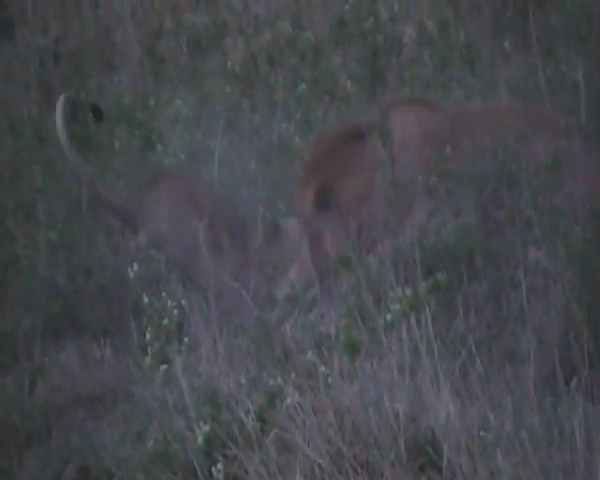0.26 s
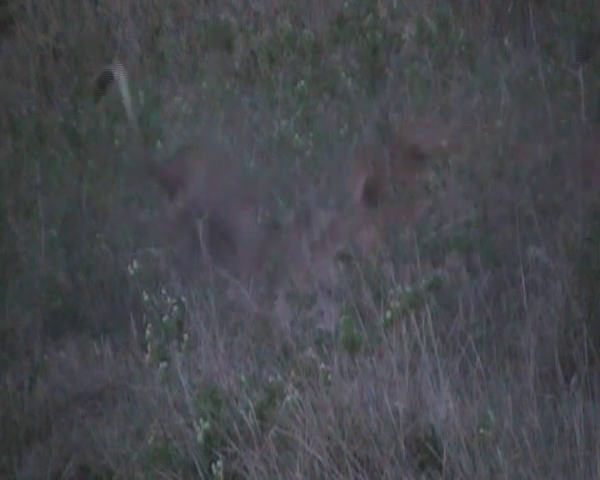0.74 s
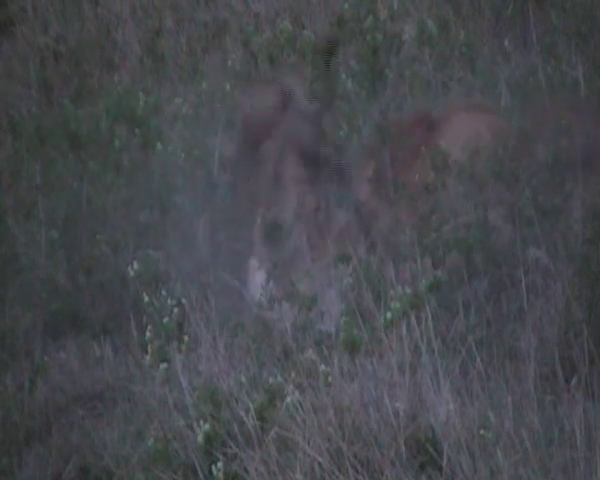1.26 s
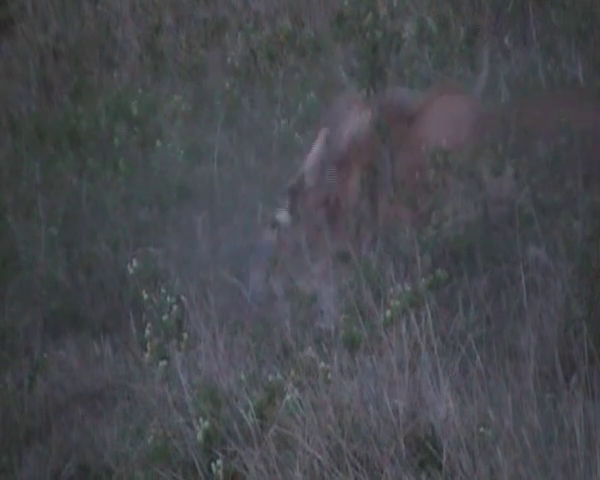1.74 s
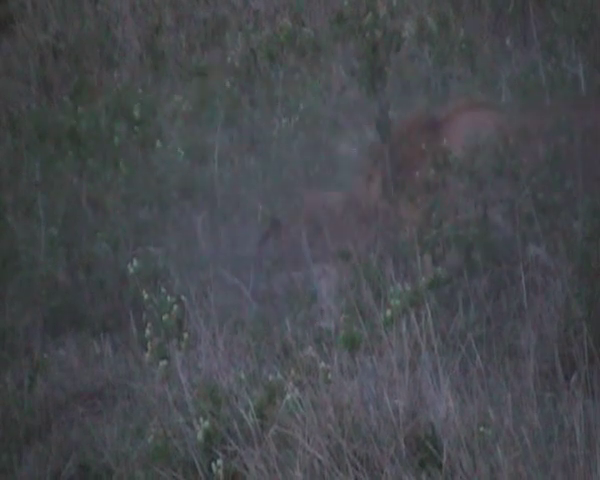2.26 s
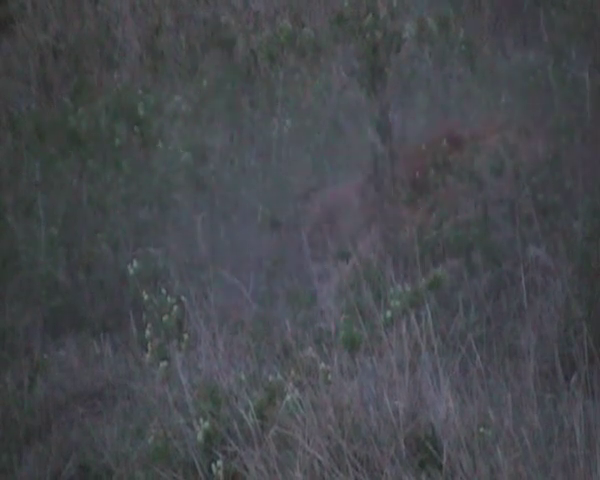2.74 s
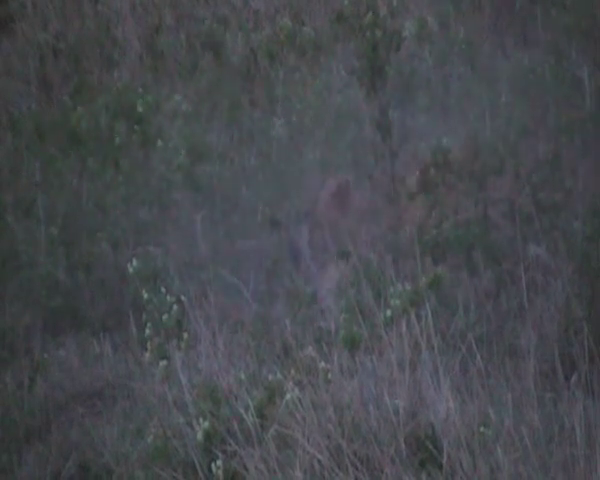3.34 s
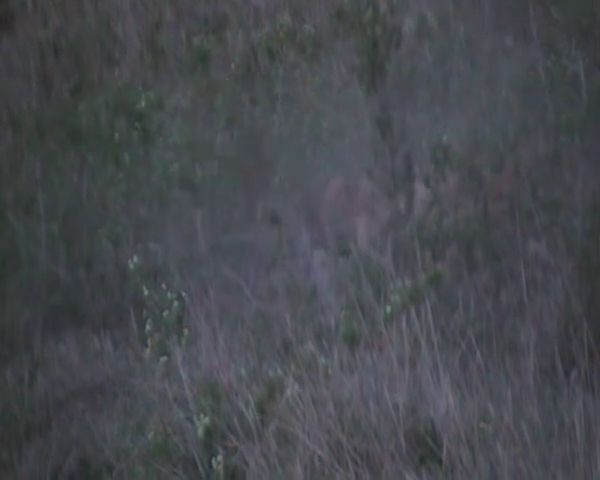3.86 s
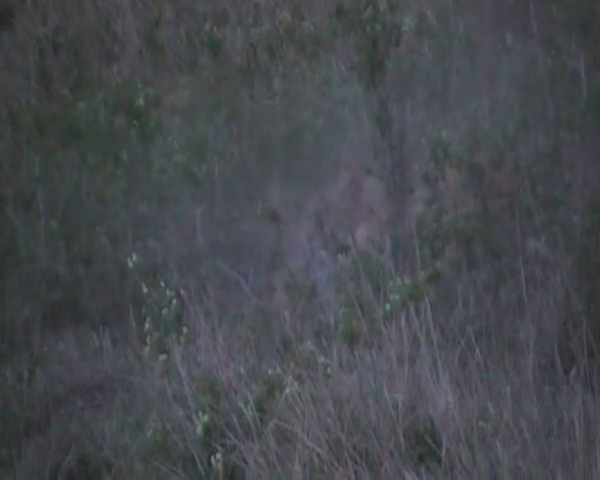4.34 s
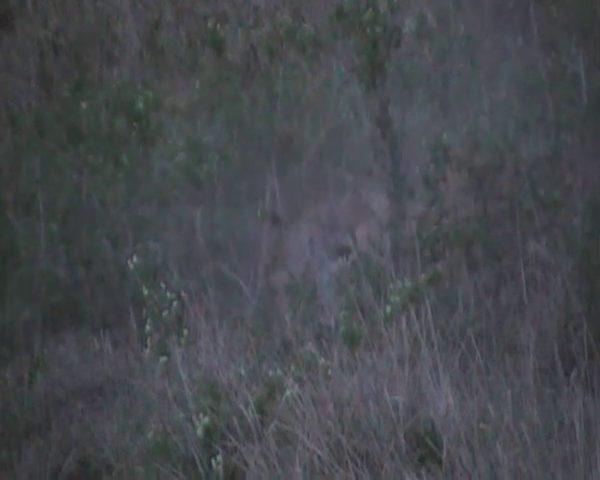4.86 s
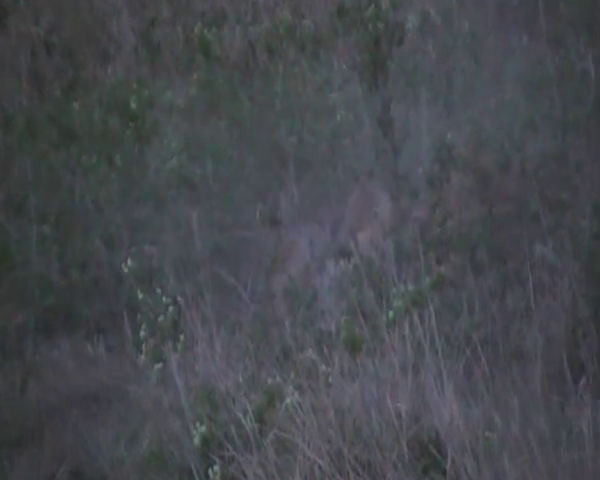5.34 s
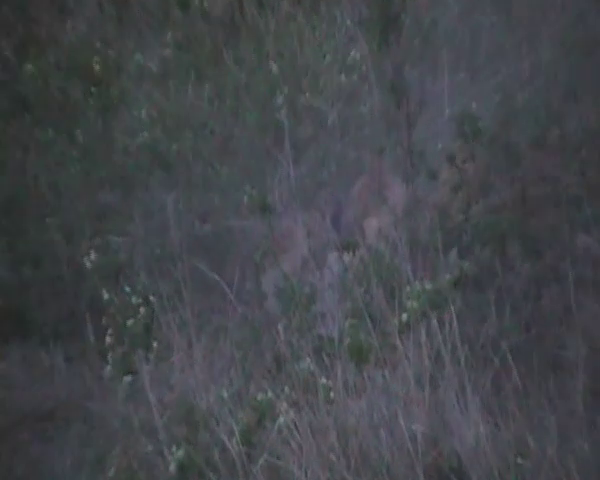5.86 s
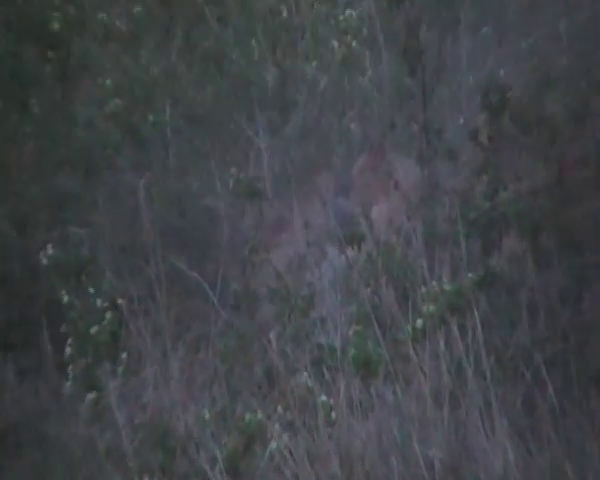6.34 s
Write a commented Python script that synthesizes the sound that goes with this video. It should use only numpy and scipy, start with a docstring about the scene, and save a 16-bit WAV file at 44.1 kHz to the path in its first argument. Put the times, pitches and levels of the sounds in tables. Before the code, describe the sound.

Silence at first, then grass rustle, twig snaps and a thump as lions pull down a warthog in dry bush. It gives a long piercing scream, fluttering and torn with rasp, dropping to a lower wail. After a short rattle comes an arching squeal, hoarse stuttering croaks, throat snaps and a last squeal cut off. A cricket chirps steadily with pauses. The fight is straight ahead, loud and fairly close, with faint bush echo and a low drone.

```python
"""Warthog seized by lions

Dry bush at dusk: one long harsh scream breaks into a wail, then hoarse croaks and arching squeals.
The voice is a high whistle chopped by the slow, uneven flutter of the throat, with rasping noise in every puff.
Around it a cricket plays short sagging tones with two rests, grass rustles, twigs snap and low thumps fall:
bodies on the ground and one gulp of the throat. Noise tails give a faint echo from the bush; a low drone
and open air lie beneath."""
import sys
import numpy as np
from scipy import signal
from scipy.fft import rfft, irfft, next_fast_len
from scipy.io import wavfile
from scipy.ndimage import uniform_filter1d, map_coordinates

SR = 44100
rng = np.random.default_rng(int(sys.argv[2]) if len(sys.argv) > 2 else 0)


def store_pcm(level_fs):
    """Save levels as 16-bit WAV."""
    pcm = np.round(np.clip(level_fs, -1, 1) * 32767).astype(np.int16)
    wavfile.write(sys.argv[1], SR, np.atleast_2d(pcm).T)


N = 291045

# Table and setting levels are relative: the mixes below trim them.


def amp(db):
    """Decibels to gain."""
    return 10 ** (np.asarray(db) / 20)


def unit(x):
    """Scale to rms 1."""
    return x / np.sqrt(np.mean(x ** 2) + 1e-20)


def clock():
    """Time of every sample in seconds."""
    return np.arange(N) / SR


def since(s):
    """Seconds gone by after a moment, 0 before it."""
    return np.maximum(clock() - s, 0)


def along(points, hz):
    """Interpolate (Hz, value) points on a log axis."""
    f, v = np.transpose(points)
    return np.interp(np.log(hz + 1), np.log(f + 1), v)


def curves(rows):
    """One value per sample for each column after the time."""
    s, *cols = np.transpose(rows)
    return [np.interp(clock(), s, c) for c in cols]


def window(start, end, edge):
    """1 between two times, with sloping edges."""
    return np.clip(np.minimum(clock() - start, end - clock()) / edge + .5, 0, 1)


def bump(s, half_s):
    """A bell in time around s, peak 1."""
    return np.exp(-((clock() - s) / half_s) ** 2)


def blow(s, rise_s):
    """A quick swell that peaks after rise_s and dies away."""
    swell = since(s) / rise_s
    return swell * np.exp(1 - swell)


def wobble(rate):
    """A smooth random curve, rate knots a second."""
    return map_coordinates(rng.standard_normal(int(N * rate / SR) + 4), [clock() * rate])


def filtered(x, response):
    """Multiply the spectrum of x by a response of frequency."""
    m = next_fast_len(N + SR // 2)
    return irfft(rfft(x, m) * response(np.fft.rfftfreq(m, 1 / SR)), m)[..., :N]


def noise(spectrum, gate=1):
    """Gated noise of rms 1 with a given colour."""
    return unit(filtered(gate * rng.standard_normal(N), lambda hz: amp(along(spectrum, hz))))


def ring(modes, gate=1):
    """Gated noise of rms 1 in resonances, each squared to steepen it."""
    def body(f):
        return sum(amp(db) * (1j * f * w / (c * c - f * f + 1j * f * w)) ** 2 for c, w, db in modes)
    return unit(filtered(gate * rng.standard_normal(N), body))


def formant(centre, width_hz, gate):
    """Gated noise of rms 1 in a resonance that moves."""
    slow = filtered(gate * rng.standard_normal((2, N)), lambda hz: 1 / (1 + (2 * hz / width_hz) ** 2))
    phase = 2 * np.pi * np.cumsum(centre) / SR
    return unit(slow[0] * np.cos(phase) + slow[1] * np.sin(phase))


def patches(x, depth_db):
    """Turbulence shifts: narrow bands swell and fade on their own."""
    z = signal.stft(x, nperseg=512)[2]
    field = rng.standard_normal(z.shape)
    field = uniform_filter1d(uniform_filter1d(field, size=3, axis=0), size=9, axis=1)
    return unit(signal.istft(z * amp(depth_db * unit(field)), nperseg=512)[1][:N])


# Colour of the open air. Each row: frequency in Hz, density in dB per Hz.
AIR_SPECTRUM = [(15, -55), (25, -84), (60, -5), (125, -2), (186, -1), (299, -8.5), (353, 0.5), (399, -4),
                (712, -6.5), (858, -6.5), (1810, -12), (2040, -8.5), (3500, -23), (4550, -63), (7700, -120)]


def background():
    """Coloured noise of open air and a low, distant drone, a little different at each ear."""
    def bed():
        return amp(-47) * noise(AIR_SPECTRUM) + amp(-51.0) * ring([(74.7, 38, 0)])
    side = amp(-7) * np.array([[1], [-1]])
    return bed() + side * bed()


# Trampled grass. Each row: time in seconds, level in dB.
GRASS_LEVEL = [(.69, -54), (.8, -48.5), (1.1, -52.5), (3.8, -52), (4.15, -49), (5.3, -57.5), (6.6, -63)]
# Colour of dry straw. Each row: frequency in Hz, density in dB per Hz.
STRAW_SPECTRUM = [(50, -25), (200, 10.5), (600, -26), (1500, -8), (3000, 5.5), (7000, 8.5), (10300, 9),
                  (11500, -5.5), (14000, -10), (15500, -59)]
# Twig snaps. Each row: start in seconds, starting level in dB.
TWIG_SNAPS = [(0.961, -26), (0.9714, -41), (1.0242, -28.5), (1.061, -40), (5.858, -31)]
# Low thumps: bodies on the ground, but at 4.945 s a low gulp of the throat as the voice catches.
# Each row: start in seconds, frequency in Hz, peak level in dB.
LOW_THUMPS = [(.78, 230, -34.5), (1.76, 179.2, -41), (2.042, 175, -31), (3.715, 181, -31),
              (4.027, 184, -34), (4.945, 185.3, -35)]


def scuffle():
    """Grass is flickering noise, twigs are decaying noise without bass, thumps and gulp are brief low tones."""
    grass_gain = amp(curves(GRASS_LEVEL)[0] + 0.4 * wobble(8.5))
    out = grass_gain * noise(STRAW_SPECTRUM, amp(2.5 * wobble(700)))
    crack = unit(filtered(noise(STRAW_SPECTRUM), lambda hz: hz / (hz + 1500)))  # a thin twig has no body
    for s, db in TWIG_SNAPS:
        age = since(s)
        out = out + amp(db - 60 * age / 0.021) * crack * (age > 0)
    for s, hz, db in LOW_THUMPS:
        out = out + amp(db) * blow(s, rise_s=0.0042) * np.sin(2 * np.pi * hz * clock())
    return out


# Cricket timing. Each row: chirp number, time in seconds.
CHIRP_TIMES = [(0, .722), (4, 1.09), (43, 4.692), (50, 5.355), (55, 5.82), (60, 6.278), (64, 6.645)]
# Cricket rests. Each row: start in seconds, end in seconds.
CRICKET_RESTS = [(3.67, 4.68), (6.33, 6.7)]


def cricket(top_hz=4840, fall_hz=230, length_s=0.029, level_db=-31):
    """Each wing stroke is a short tone that sags in pitch; others far off are a band of noise."""
    number, s = np.transpose(CHIRP_TIMES)
    period_s = np.mean(np.diff(s) / np.diff(number))
    age = np.interp(clock(), s, number) % 1 * period_s
    stroke = np.clip(age / length_s, 0, 1)
    phase = 2 * np.pi * np.cumsum(top_hz - fall_hz * stroke ** 0.87) / SR
    envelope = np.abs(np.sin(np.pi * stroke)) ** 0.49
    awake = 1 - sum(window(a, b, .01) for a, b in CRICKET_RESTS)
    return amp(level_db) * envelope * np.sin(phase) * awake + amp(-51.5) * ring([(4730, 650, 0)])


def flutter(rate, depth, rough, jitter=.36):
    """Uneven throat opening: cycle count, opening 0-1, puffs with running mean power 1, roughness, depth."""
    depth, rough = np.clip(depth, 0, 1), np.clip(rough, .02, 1.2)
    cycles = np.cumsum(rate * np.exp(jitter * np.sqrt(rough) * wobble(260))) / SR
    opening = (.5 - .5 * np.cos(2 * np.pi * cycles)) ** 1.328
    puffs = 1 - depth + depth * opening
    puffs = puffs / np.sqrt(np.abs(uniform_filter1d(puffs ** 2, SR // 25)))
    return cycles, opening, puffs, rough, depth


def whistle(pitch, throat, smear=.13, bend=0.11, waver=.008):
    """Phase of the whistle: it bends upward within each puff and scatters when the throat is rough."""
    cycles, opening, puffs, rough, depth = throat
    scatter = smear * rough * wobble(1100) * (1.5 - opening)
    glide = bend * depth * np.sin(2 * np.pi * cycles)
    drift = scatter - glide + waver * wobble(45)
    return 2 * np.pi * np.cumsum(pitch * (1 + drift)) / SR


def partial(phase, order):
    """One harmonic of the whistle, rms 1."""
    return np.sqrt(2) * np.sin(order * phase)


# Snout cavities. Each row: frequency in Hz, width in Hz, level in dB.
SNOUT_MODES = [(473, 48, -0.5), (390, 20, -7)]
SNOUT_TONE_HZ, SNOUT_TONE_DB = 488, -7.5


def snout(throat):
    """The snout's boom: puffs in its cavities around a firm, wavering note."""
    phase = whistle(SNOUT_TONE_HZ, throat, smear=0.034, bend=0.022, waver=.035)
    note = throat[2] * partial(phase, order=1)
    return amp(-2.5) * ring(SNOUT_MODES, throat[2]) + amp(SNOUT_TONE_DB) * note


# Scream. Each row: time in seconds, whistle pitch in Hz, whistle level in dB.
SCREAM_PATH = [(1.125, 2150, -23), (1.191, 3000, -17), (1.38, 2758, -17), (1.55, 2915, -23.5),
               (1.68, 3304, -21.5), (1.784, 2679, -13), (1.85, 3151, -31), (2.02, 3296, -22),
               (2.27, 2893, -27.5), (2.39, 3153, -15.5), (2.53, 2923, -15.5), (2.63, 3358, -25),
               (2.69, 3080, -12.5), (2.81, 3013, -16.5), (2.869, 2537, -12), (2.944, 2120, -11)]
# Lowest mouth resonance, moving with the jaw. Each row: time in seconds, frequency in Hz.
JAW_RESONANCE = [(1.8, 871.5), (1.95, 1150), (2.12, 1150), (2.3, 957.3), (2.48, 853.8), (2.62, 1069),
                 (2.8, 953.6)]
# Colour of the rasp. Each row: frequency in Hz, density in dB per Hz.
HARSH_SPECTRUM = [(600, -22), (740, -1), (1000, 2), (1500, 2), (2300, 0.5), (3300, -2), (4400, -12),
                  (5200, -32), (7000, -39), (12000, -70)]
# Colour of the hiss. Each row: frequency in Hz, density in dB per Hz.
HISS_SPECTRUM = [(3000, 2.5), (5200, -1.5), (6800, -25), (7700, -3), (8700, 6), (9800, 7), (10500, -6),
                 (11200, -1), (13000, -13), (14200, -23), (15500, -68)]
# Shrill ring above the voice. Each row: frequency in Hz, width in Hz, level in dB.
SHRILL_MODES = [(6590, 560, 0)]
# The ring flares when the scream is pushed highest. Each row: time in seconds, half length in seconds, lift in dB.
SHRILL_FLARES = [(1.71, 0.34, 15), (2.016, 0.065, 19), (2.67, .13, 13)]
SHRILL_DB, SCREAM_HISS_DB = -29, -26.5
TEAR_S, TEAR_LENGTH_S = 1.735, .11  # the scream tears into a rasp
RASP_DB, TEAR_RASP_DB, RASP_GROWTH_DB_PER_S = -40.5, 15, 2.5  # at first, added by the tear, growth
OCTAVE_DB, OCTAVE_FADE_DB_PER_S2 = -18.5, 1.37
SNOUT_DB, SNOUT_FADE_DB_PER_S = -22.5, 2.5
TREBLE_LAG_DB, TREBLE_LAG_S = -12, 0.027  # the treble arrives as the mouth opens
# a firm upper strand that follows the whistle only a little
STRAND_HZ, STRAND_FOLLOW, STRAND_DB, STRAND_END_S = 3193, .3, -25.5, 3.7


def scream():
    """Wide mouth: a whistle, part firm and part torn, over a loud rasp; snout boom below, shrill ring above."""
    pitch, whistle_db = curves(SCREAM_PATH)
    start_s, end_s = SCREAM_PATH[0][0], SCREAM_PATH[-1][0]
    age = since(start_s)
    tear = np.clip(since(TEAR_S) / TEAR_LENGTH_S, 0, 1)
    opening_db = TREBLE_LAG_DB * np.exp(-age / TREBLE_LAG_S)
    flare_db = sum(db * bump(s, half_s) for s, half_s, db in SHRILL_FLARES)
    octave_db = OCTAVE_DB - OCTAVE_FADE_DB_PER_S2 * age ** 2 + opening_db
    octave_db = octave_db - 0.15 * flare_db  # a flare draws from the octave
    rasp_db = RASP_DB + TEAR_RASP_DB * tear + RASP_GROWTH_DB_PER_S * age
    hiss_db = SCREAM_HISS_DB + opening_db
    snout_db = SNOUT_DB - SNOUT_FADE_DB_PER_S * age
    shrill_db = SHRILL_DB + flare_db + opening_db

    throat = flutter(rate=248 * (pitch / 3000) ** .8, depth=.56 - 0.15 * tear,
                     rough=.45 + .42 * tear, jitter=.28)
    puffs = throat[2]
    torn = whistle(pitch, throat, smear=.11, bend=0.1, waver=0.014)
    core = whistle(pitch, throat, smear=.015, bend=.06, waver=.008)
    strand_hz = STRAND_HZ * (pitch / 3000) ** STRAND_FOLLOW
    strand = whistle(strand_hz, throat, smear=0.0197, bend=0.023)
    jaw = whistle(curves(JAW_RESONANCE)[0], throat, smear=0.049, bend=0.12, waver=0.0285)

    def blend(order):
        return .68 * partial(core, order) + .73 * partial(torn, order)

    tone = amp(whistle_db - 2.5) * blend(order=1) + amp(octave_db - 2.5) * blend(order=2)
    overtones = 1.23 * partial(torn, order=3) + 0.5 * partial(core, order=3) + 0.21 * partial(core, order=4)
    tone = tone + amp(hiss_db - 6.5) * overtones
    strand_gain = amp(STRAND_DB + opening_db) * window(start_s, STRAND_END_S, 0.026)
    tone = tone + strand_gain * partial(strand, order=1)
    growl = amp(rasp_db - 9) * partial(jaw, order=1)

    air = amp(rasp_db + 3.0) * patches(noise(HARSH_SPECTRUM, puffs), depth_db=4.0)
    air = air + amp(whistle_db - 6.5) * patches(formant(.88 * pitch, 590, puffs), depth_db=0.5)
    air = air + amp(hiss_db) * patches(noise(HISS_SPECTRUM, puffs), depth_db=5.5)

    cavities = amp(snout_db) * snout(throat) + amp(shrill_db - 9.0) * ring(SHRILL_MODES, puffs)
    cavities = cavities + amp(octave_db - 9.5) * ring([(5640, 130, 0)], puffs)
    # the mouth radiates no bass
    mouth = filtered(puffs * (tone + growl) + air, lambda hz: 1 - 1 / (1 + (hz / 620) ** 8))
    return (mouth + cavities) * window(start_s, end_s, 0.027)


# Colour of the hoarse rasp. Each row: frequency in Hz, density in dB per Hz.
HOARSE_SPECTRUM = [(50, -55), (150, -40), (300, -39), (450, 1), (590, -11), (720, -1), (1000, 2.5),
                   (1900, 6), (2700, -15.5), (3600, -4), (5500, -13.5), (12000, -99)]
# Colour of the hiss of wail and squeals. Each row: frequency in Hz, density in dB per Hz.
BREATHY_SPECTRUM = [(4000, -26), (5400, -9), (6800, 3), (7600, 6.5), (8800, -2), (10300, -2), (11200, -11),
                    (12800, -34), (14000, -29), (15500, -57)]
# Snout response to the flutter. Each row: frequency in Hz, gain in dB.
HUM_RESPONSE = [(60, -52), (170, -11.5), (270, -38), (380, -0.5), (500, 6.5), (620, 17), (1000, -41)]


def narrow_mouth(throat, pitch, whistle_db, octave_db, rasp_db, hiss_db, overtone_db,
                 tongue_hz, tongue_db, snout_db, torn_db):
    """Narrower mouth: the whistle dominates, overtones follow it and air sings in resonances around it."""
    puffs, rough = throat[2:4]
    phase = whistle(pitch, throat, smear=0.14, bend=0.0827, waver=.006)
    overtones = 0.43 * partial(phase, order=3) + 0.21 * partial(phase, order=4) + 0.23 * partial(phase, order=5)
    tone = amp(whistle_db - 2.5) * partial(phase, order=1) + amp(octave_db - 4.5) * partial(phase, order=2)
    tone = tone + amp(hiss_db + overtone_db) * overtones
    air = amp(rasp_db) * patches(noise(HOARSE_SPECTRUM, puffs), depth_db=3.5)
    air = air + amp(hiss_db) * patches(noise(BREATHY_SPECTRUM, puffs), depth_db=6.0)
    upper = amp(hiss_db + tongue_db) * patches(formant(tongue_hz, 600, puffs), depth_db=1.5)
    torn = amp(whistle_db + torn_db) * np.sqrt(rough) * formant(.92 * pitch, 380, puffs)
    torn = torn + amp(octave_db - 6.5) * formant(2 * pitch, 410, puffs)  # the octave frays too
    # the flutter itself, through the snout
    hum = unit(filtered(puffs - puffs.mean(), lambda hz: amp(along(HUM_RESPONSE, hz))))
    return puffs * tone + air + upper + torn + amp(rasp_db + snout_db) * hum


# Wail. Each row: time in seconds, whistle pitch in Hz, whistle level in dB.
WAIL_PATH = [(2.93, 2006, -14), (3.03, 2291, -15.5), (3.111, 2184, -11), (3.269, 2199, -11),
             (3.421, 2493, -14.5), (3.55, 2433, -11.5), (3.705, 2240, -5.5), (3.727, 2006, -9.5)]
# Upper mouth resonance. Each row: time in seconds, frequency in Hz.
TONGUE_RESONANCE = [(2.95, 4943), (3.15, 4800), (3.43, 5362), (3.55, 5124), (3.66, 4380), (3.73, 4237)]


def wail(slack_hz=2200, taut_hz=2470):
    """A lower, rasping wail; pushing higher speeds the flutter and adds hiss, and the snout booms on."""
    pitch, whistle_db = curves(WAIL_PATH)
    effort = np.clip((pitch - slack_hz) / (taut_hz - slack_hz), 0, 1)
    throat = flutter(rate=160 + 36 * effort, depth=0.57, rough=.43)
    voice = narrow_mouth(throat, pitch, whistle_db, octave_db=whistle_db - 18.5, rasp_db=-21.0,
                         hiss_db=-34.5 + 6.9 * effort, overtone_db=-7.5,
                         tongue_hz=curves(TONGUE_RESONANCE)[0], tongue_db=6, snout_db=-21, torn_db=-8)
    return (voice + amp(-34.5) * snout(throat)) * window(WAIL_PATH[0][0], WAIL_PATH[-1][0], 0.0092)


# Rattling croaks. Each row: start in seconds, length in seconds, level in dB.
CROAK_BURSTS = [(3.764, 0.15, -36), (5.234, 0.01, -22), (5.252, 0.033, -26.5), (5.29, 0.1, -31),
                (5.404, 0.027, -22), (5.445, .03, -26.5), (5.487, 0.11, -29.5), (5.621, 0.01, -27.5),
                (5.656, 0.012, -26.5), (5.691, .052, -28.5), (5.753, 0.022, -26), (5.793, 0.079, -23.5),
                (5.882, 0.013, -27.5), (5.906, 0.06, -21)]
# Resonance of the slack mouth. Each row: time in seconds, frequency in Hz.
SLACK_MOUTH = [(3.8, 1818), (5.24, 1376), (5.45, 1139), (6.18, 1108), (6.25, 1560)]
# Runs of single snaps. Each row: start in seconds, period in seconds, count.
THROAT_SNAPS = [(5.977, .0188, 5), (6.088, .0222, 7)]
# Colour of the croak. Each row: frequency in Hz, density in dB per Hz.
CROAK_SPECTRUM = [(210, -49), (350, -39), (414, -7.5), (579, -11), (630, 1), (678, 6), (929, 5.5),
                  (1150, -4.5), (1270, 3.5), (1670, -0.5), (1980, 3), (2570, -21), (3790, -14.5),
                  (4300, -18), (5590, -49), (9460, -120)]
SNAP_RISE_S, SNAP_DB, SNAP_GROWTH_DB_PER_S = .0032, -23, 19  # the snaps swell toward the next squeal


def croaks():
    """Little pressure: bursts rattle hoarsely, then slow to single snaps of the throat that ring the mouth."""
    throat = flutter(rate=164, depth=0.51, rough=0.23)
    puffs = throat[2]
    pitch, = curves(SLACK_MOUTH)
    rattle_gain = sum(amp(db) * window(s, s + length, 0.0088) for s, length, db in CROAK_BURSTS)
    snap_times = [s for first, period, count in THROAT_SNAPS for s in first + period * np.arange(count)]
    snap_gain = sum(blow(s, SNAP_RISE_S) for s in snap_times)
    snap_gain = snap_gain * amp(SNAP_DB + SNAP_GROWTH_DB_PER_S * since(THROAT_SNAPS[0][0]))
    mouth = partial(whistle(pitch, throat, smear=.25, bend=0.1, waver=.03), order=1)
    upper = partial(whistle(pitch, throat, smear=0.81), order=3)
    rattle = amp(-4.5) * noise(CROAK_SPECTRUM, puffs) + amp(-8.0) * puffs * mouth
    snap = amp(-5.5) * noise(CROAK_SPECTRUM) + amp(-3.0) * mouth + amp(-20.0) * upper
    return rattle_gain * rattle + snap_gain * snap


SLACK_HZ, TAUT_HZ = 1638, 2022  # pitch at no effort and at full effort
SQUEAL_DB, SQUEAL_RASP_DB = -15.8, -29.5  # whistle and rasp when slack
# added by full effort
EFFORT_WHISTLE_DB, EFFORT_OCTAVE_DB, EFFORT_HISS_DB, EFFORT_RASP_DB = 5.5, 25, 13.5, 1
# added by the first rough rush of air, and its time to die away
ONSET_OCTAVE_DB, ONSET_HISS_DB, ONSET_RASP_DB, ONSET_S = 18.5, 10.5, 5.5, 0.181
# slight early dip in whistle level, second squeal only: centre after the start, half length
DIP_S, DIP_HALF_S = 0.18, 0.034


def squeal(arch, attack_s, slack_octave_db, slack_hiss_db, tongue_db, dip_db):
    """A rough onset, then an arch of effort: higher is louder and brighter, flutter faster and shallower."""
    pitch, = curves(arch)
    start_s, end_s = arch[0][0], arch[-1][0]
    age = since(start_s)
    effort = np.clip((pitch - SLACK_HZ) / (TAUT_HZ - SLACK_HZ), 0, 1)
    onset = np.exp(-(age / ONSET_S) ** 4) * (1 - effort)
    dip = np.exp(-((age - DIP_S) / DIP_HALF_S) ** 2)
    throat = flutter(rate=157 + 48 * effort ** 2, depth=.85 - 0.53 * effort, rough=.2 + .3 * onset, jitter=0.33)
    voice = narrow_mouth(throat, pitch,
                         whistle_db=SQUEAL_DB + EFFORT_WHISTLE_DB * effort + dip_db * dip,
                         octave_db=slack_octave_db + EFFORT_OCTAVE_DB * effort + ONSET_OCTAVE_DB * onset,
                         rasp_db=SQUEAL_RASP_DB + EFFORT_RASP_DB * effort + ONSET_RASP_DB * onset,
                         hiss_db=slack_hiss_db + EFFORT_HISS_DB * effort + ONSET_HISS_DB * onset,
                         overtone_db=7, tongue_hz=5750 + 2.1 * (pitch - TAUT_HZ), tongue_db=tongue_db,
                         snout_db=-28, torn_db=-2)
    return voice * (1 - np.exp(-age / attack_s)) * window(start_s, end_s, 0.0087)


# One list per squeal. Each row: time in seconds, whistle pitch in Hz.
SQUEAL_ARCHES = [
    [(4.2, 1009), (4.25, 1221), (4.35, 1769), (4.42, 1962), (4.57, 2100), (4.82, 1660), (4.94, 1635),
     (5.09, 1850), (5.212, 1485)],
    [(6.24, 1519), (6.31, 1781), (6.39, 1793), (6.42, 1933), (6.57, 2083), (6.615, 1830)],
]
# One row per squeal. Each row: attack in seconds, slack octave in dB, slack hiss in dB,
# tongue resonance over the hiss in dB, early dip of the whistle in dB (0 is none).
SQUEAL_SETTINGS = [(0.026, -47, -57, 4, 0), (0.0061, -49.5, -57, -18, -1)]
# The voice catches. Each row: time in seconds, half length in seconds, dip in dB.
VOICE_CATCHES = [(4.25, 0.0029, -1.5), (4.954, 0.0063, -39), (5.168, 0.0074, -12), (6.273, 0.0063, -39),
                 (6.392, 0.0049, -25), (6.573, 0.0054, -8)]
# Peaks and hollows in the voice. Each row: frequency in Hz, half width in Hz, gain in dB.
VOICE_COLOUR = [(610, 55, -9), (5080, 130, -4), (5720, 200, 3), (6170, 130, -11), (6530, 150, 2),
                (6990, 170, -8), (7550, 250, 5), (8060, 170, -9), (8800, 250, 2), (10100, 200, 3),
                (11200, 300, -4)]


def warthog():
    """All calls share one colour; brief dips make the voice catch, except in the croaks."""
    voice = scream() + wail()
    voice = voice + sum(squeal(arch, *row) for arch, row in zip(SQUEAL_ARCHES, SQUEAL_SETTINGS))
    catch_db = sum(db * bump(s, half_s) for s, half_s, db in VOICE_CATCHES)

    def colour(f):
        low_cut = 1 - 1 / (1 + (f / 140) ** 6)
        return low_cut * amp(sum(db * np.exp(-((f - hz) / width) ** 2) for hz, width, db in VOICE_COLOUR))

    return filtered(voice * amp(catch_db) + croaks(), colour)


def ground(x, dull_hz=6000, delay_s=.00296):
    """A bounce off the ground combs the voice into strands; the grass dulls it."""
    def response(hz):
        bounce = .28 * np.exp(-2j * np.pi * hz * delay_s)
        return 1 + bounce / (1 + (hz / dull_hz) ** 2)
    return filtered(x, response)


# Echo decay. Each row: frequency in Hz, time to fall 60 dB in seconds.
BUSH_DECAY = [(200, 0.56), (2000, 0.3), (10000, 0.6)]


def bush(x):
    """Scattered echo from shrubs and trunks: convolution with decaying noise, separate for each ear."""
    hz, t, z = signal.stft(rng.standard_normal((2, SR // 2)), SR, nperseg=256)
    decay = amp(-60 * t / along(BUSH_DECAY, hz)[:, None])
    tail = signal.istft(z * decay, SR, nperseg=256)[1]
    return signal.fftconvolve(x[None], tail / np.linalg.norm(tail[0]), axes=1)[:, :N]


# Ear balance. Each row: frequency in Hz, left minus right in dB.
EAR_BALANCE = [(60, -2), (500, -2), (1200, -1.2), (2300, 0.8), (4300, -2.5), (9000, 0.8)]


def scene():
    """The struggle is straight ahead, in the open; a slight tilt by frequency sets the ears apart."""
    fight = ground(warthog()) + scuffle()
    mix = fight + cricket() + amp(-13.5) * bush(fight) + background()
    return filtered(mix, lambda hz: amp(along(EAR_BALANCE, hz) * np.array([[.5], [-.5]])))


START_S, TOP_HZ = .695, 14800


def record(dry):
    """Fade in after a silent start, round off only the very loudest peaks, cut the top."""
    x = dry * np.clip((clock() - START_S) / 0.028, 0, 1)
    x = x / (1 + np.abs(x / .98) ** 12) ** (1 / 12)
    return filtered(x, lambda hz: 1 / (1 + (hz / TOP_HZ) ** 80))


dry = scene()
out = record(dry)
store_pcm(out)
```